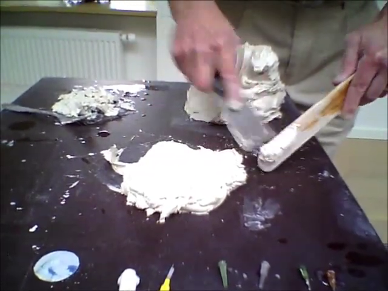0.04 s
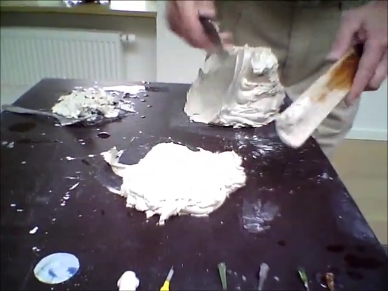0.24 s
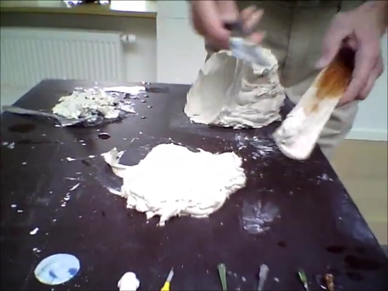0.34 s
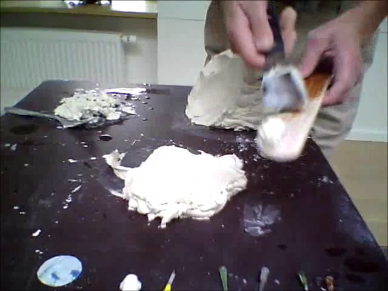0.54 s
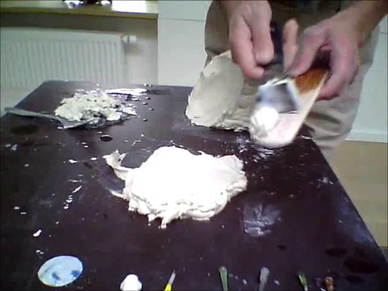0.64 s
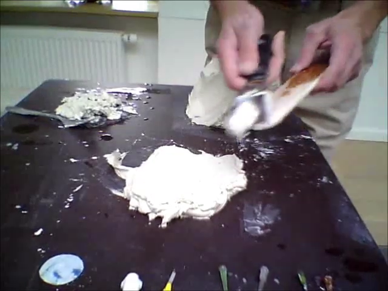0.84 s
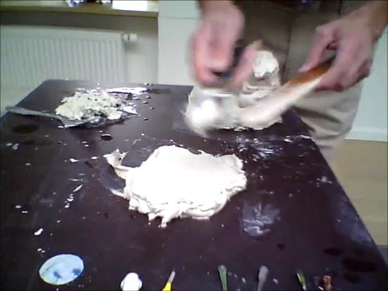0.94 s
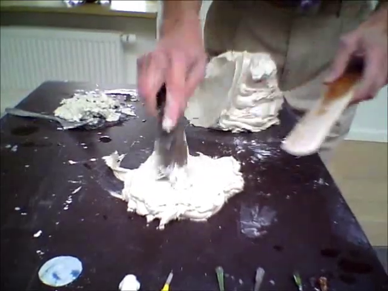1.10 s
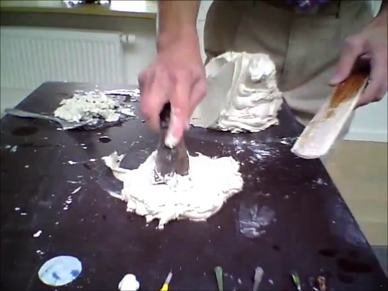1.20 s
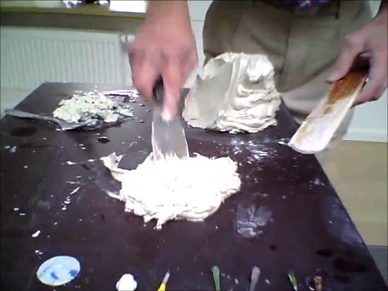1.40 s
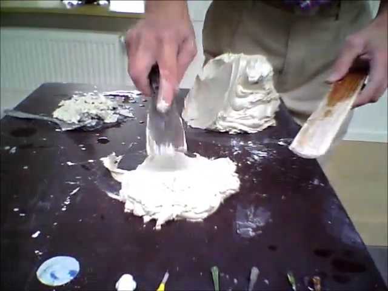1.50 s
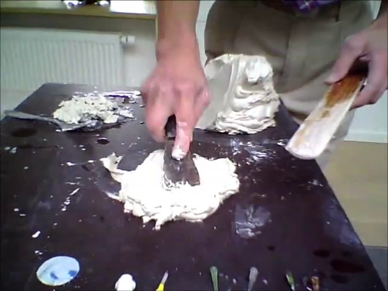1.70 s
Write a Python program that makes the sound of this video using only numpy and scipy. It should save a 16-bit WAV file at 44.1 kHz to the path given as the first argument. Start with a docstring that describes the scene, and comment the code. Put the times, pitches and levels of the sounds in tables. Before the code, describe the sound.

A steel scraper drags soft clay off a wooden paddle and clacks against its edge. A lighter tap, faint scrapes and small wet ticks follow, heard close in a small workshop with low rumble and hiss.

```python
"""A steel scraper drags soft clay off a wooden paddle, slips over the edge and clacks against it.
It taps the paddle, wipes off more clay, presses it into the heap and lifts away with a wet tick.
Grit under the blade makes the scrape; each hit is a ring of blade or wood plus a burst of noise.
A small, hard-walled workshop rings behind each contact, over a low rumble and faint hiss."""
import sys
import numpy as np
from scipy import signal
from scipy.fft import rfft, irfft
from scipy.io import wavfile

SR = 44100
rng = np.random.default_rng(int(sys.argv[2]) if len(sys.argv) > 2 else 0)


def output_pcm(signal):
    """Save a mono or channel-first signal as 16-bit PCM at the path in sys.argv[1].

    Samples are clipped to [-1, 1] before scaling.
    """
    pcm = np.clip(np.atleast_2d(signal).T, -1, 1) * 32767
    wavfile.write(sys.argv[1], SR, np.round(pcm).astype(np.int16))


N = 77175
TIME = np.arange(N) / SR   # s


def from_db(db):
    """Decibels to gain."""
    return 10 ** (np.asarray(db) / 20)


def rms_one(x):
    """Scale to an rms of one."""
    return x / np.sqrt(np.mean(x ** 2) + 1e-20)


def unit_energy(x):
    """Scale to an energy of one."""
    return x / np.sqrt(np.sum(x ** 2) + 1e-20)


def at_hz(points, hz):
    """Read a curve on a log-frequency axis."""
    freqs, values = np.transpose(points)
    return np.interp(np.log(np.maximum(hz, 1)), np.log(freqs), values)


def through(x, response):
    """Pass a sound through an impulse response."""
    return signal.fftconvolve(x, response)[:N]


def butter(x, hz, kind="low", order=2):
    """Butterworth low-, high- or band-pass."""
    return signal.sosfilt(signal.butter(order, hz, kind, fs=SR, output="sos"), x + 1e-18)


def brighten(x, treble_db, corner_hz=2780):
    """Treble shelf."""
    low = butter(x, corner_hz, order=1)
    return low + from_db(treble_db) * (x - low)


def eq(points, size=8192):
    """Minimum-phase impulse response shaped by an EQ curve, with unit energy."""
    gain = from_db(at_hz(points, np.arange(size // 2 + 1) * SR / size))
    cepstrum = irfft(np.log(gain))
    cepstrum[1:size // 2] *= 2
    cepstrum[size // 2 + 1:] = 0
    return unit_energy(irfft(np.exp(rfft(cepstrum))))


def body(modes):
    """Impulse response of decaying modes of alternating polarity, with unit energy."""
    t = TIME[:SR // 2]
    ring = 0
    for k, (hz, db, t60) in enumerate(modes):
        mode = np.sin(2 * np.pi * hz * t) * np.exp(-np.log(1000) * t / t60)
        ring += (-1) ** k * from_db(db) * unit_energy(mode)
    return unit_energy(ring)


def contact(start_s, decay_s, size=2048):
    """A dying burst of tiny collisions with an even spectrum and unit energy."""
    fade = np.exp(-TIME[:size] / decay_s)
    burst = rng.standard_normal(size) * fade
    for _ in range(6):
        whitened = irfft(np.exp(1j * np.angle(rfft(burst))))
        burst = np.sign(whitened) * fade
    return np.concatenate([np.zeros(int(start_s * SR)), unit_energy(burst), np.zeros(N)])[:N]


def bursts(hits):
    """The rough, noisy force of a series of hits."""
    return sum(from_db(db) * brighten(contact(s, decay_s), treble_db)
               for s, db, decay_s, treble_db in hits)


def impulses(hits):
    """The clean push of each hit, which sets the modes ringing."""
    return sum(from_db(db) * brighten(signal.unit_impulse(N, int(s * SR)), treble_db)
               for s, db, _, treble_db in hits)


def steady(response):
    """Steady noise through a response, with an rms of one."""
    noise = rng.standard_normal(N + len(response) - 1)
    return rms_one(signal.fftconvolve(noise, response, "valid"))


# rumble and hiss, the centre of the bed: (frequency [Hz], level [dB])
BED_MID_EQ = [(12, -27), (20, -1.5), (146, -18), (226, -21), (435, -25), (837, -30), (1010, -29),
              (1370, -35), (1900, -34), (2930, -37.5), (6290, -41), (6830, -42.5), (13500, -41)]
# rumble and hiss, the width of the bed: (frequency [Hz], level [dB])
BED_SIDE_EQ = [(12, -34), (20, -3.5), (53, -1), (87, -20), (793, -35), (884, -35), (1130, -37.5),
               (2700, -44), (6470, -42.5), (13500, -43.5)]


def room_tone(hum_hz=134.9, hum_t60_s=0.45, pan_db=1.1):
    """A wide bed of low rumble, wavering hum and faint hiss; the lows lean right."""
    mid = from_db(-64) * steady(eq(BED_MID_EQ))
    mid += from_db(-73) * steady(body([(hum_hz, 0, hum_t60_s)]))
    side = from_db(-61) * steady(eq(BED_SIDE_EQ))
    bed = np.array([mid + side, mid - side])
    rumble = butter(bed, hz=100, order=1)
    return bed + rumble * (from_db([[-pan_db], [pan_db]]) - 1)


# strokes through clay: (peak time [s], level [dB], rise [s], release [s], treble [dB], blade ring [dB])
SCRAPE_STROKES = [(.004, -49, 0.06, 0.027, -4, -43), (.11, -59, 0.1, 0.14, 0.5, -8.5),
                  (.206, -55, 0.013, 0.024, 13, -21), (0.641, -70.5, 0.15, 0.025, 5.5, -6),
                  (.779, -68, 0.0041, 0.024, 10.5, -23), (0.833, -60.5, 0.018, 0.035, 1.5, -30),
                  (.98, -62.5, 0.11, 0.18, -1, -36), (1.04, -64.5, 0.011, 0.0062, 14, -17),
                  (1.064, -63.5, 0.0041, 0.0071, 10.5, -27), (1.14, -69, 0.046, 0.041, -24, -27),
                  (1.269, -77.5, 0.028, 0.043, 10.5, -23.5), (1.38, -74, 0.046, 0.069, 2, -6)]
# the rasp of steel on gritty clay: (frequency [Hz], level [dB])
FRICTION_EQ = [(150, -18), (700, -4), (1300, -5), (1900, 0), (3600, -1), (4600, -8.5), (5700, -10),
               (8000, -8), (10500, -10), (13500, -10)]
# the thin ring of the blade: (frequency [Hz], level [dB], t60 [s])
STEEL_MODES = [(2004, -1.5, 0.015), (2067, 4, 0.013), (2730, -4.5, 0.0088), (3210, 8.5, 0.026),
               (4700, 3.5, .008)]


def scraping(grains_per_s=3500, flutter_hz=41, flutter_db=1.5):
    """Fine grit and smooth smear under the blade swell with each stroke and make it sing faintly."""
    grit = (rng.random(N) < grains_per_s / SR) * rng.choice([-1, 1], N)
    flutter = rms_one(butter(rng.standard_normal(N), flutter_hz))
    smear = from_db(-5.5) * rng.standard_normal(N)
    force = rms_one((rms_one(grit) + smear) * from_db(flutter_db * flutter))
    rasp = through(force, eq(FRICTION_EQ))
    ring = through(force, body(STEEL_MODES))
    out = 0
    for s, db, rise_s, release_s, treble_db, ring_db in SCRAPE_STROKES:
        swell = from_db(db) * np.exp(-np.maximum((s - TIME) / rise_s, (TIME - s) / release_s))
        out += swell * (brighten(rasp, treble_db) + from_db(ring_db) * ring)
    return out


# dull sounds of paddle and worktop; the first two rows are a low ring already dying as the scene opens, the
# rest dull pushes: (peak time [s], level [dB], half length [s], pitch [Hz], t60 [s])
DULL_SOUNDS = [(.005, -60, 0.0089, 339, 0.1), (.005, -59.5, 0.014, 732, 0.095), (.84, -60, 0.063, 32, 0.2),
               (1.06, -56, 0.0067, 32.6, 0.07), (1.253, -59, .02, 95, .12)]


def thuds():
    """The paddle and worktop sound dully: a low ring already dying as the scene opens, then soft pressure."""
    out = 0
    for s, db, half_s, hz, t60 in DULL_SOUNDS:
        swell = np.exp(-((TIME - s) / half_s) ** 2)
        thud = through(swell * rng.standard_normal(N), body([(hz, 0, t60)]))
        out += from_db(db) * np.linalg.norm(swell) * unit_energy(thud)
    return out


# the blade clatters over the paddle's edge: (time [s], level [dB], decay [s], treble [dB])
CLACK_HITS = [(.2115, -7, 0.0038, 1), (.2150, -6.5, 0.0028, -15), (.2175, -7.5, 0.0093, -4.5),
              (.2212, -10.5, 0.0015, 5.5), (.2241, 2, 0.0011, -6.5), (.2251, 1, 0.0015, 1.5),
              (.2283, 0, 0.0037, -16.5), (.2417, -4.5, .0025, -1.5)]
# the ring of blade and paddle pressed together: (frequency [Hz], level [dB], t60 [s])
STEEL_ON_WOOD_MODES = [(210.4, -12.5, 0.13), (758, 1, .055), (865, 0, 0.018), (953, -3, .055),
                       (1328, 1, 0.062), (1550, 3.5, 0.022), (1714, -5.5, .025), (2470, -13.5, .018),
                       (3760, 3, .02), (3750, -6.5, .03), (4346, 8, .018), (6370, -8, .018),
                       (6660, 3, .016), (7300, 4, .018), (9030, -6, 0.029)]
# the dry crack of the attack: (frequency [Hz], level [dB])
CRACK_EQ = [(70, -15.5), (180, -13.5), (400, -12.5), (600, -5.5), (950, -3), (1150, -7), (1600, -1.5),
            (2000, -6.5), (2600, -2), (3200, -4.5), (4400, -2.5), (5700, -12.5), (7500, -10.5),
            (10000, -11), (13500, -9)]


def clack():
    """The blade slips off the clay and clatters on the paddle; returns ring and crack."""
    ring = from_db(-5.5) * through(impulses(CLACK_HITS), body(STEEL_ON_WOOD_MODES))
    crack = from_db(-1.5) * through(bursts(CLACK_HITS), eq(CRACK_EQ))
    return ring, crack


# the clay-covered blade taps the paddle: (time [s], level [dB], decay [s], treble [dB])
TAP_HITS = [(.7655, -23.5, 0.00054, 1), (.7665, -19.5, 0.002, 0.5)]
# the paddle's ring, choked by clay: (frequency [Hz], level [dB], t60 [s])
DAMPED_WOOD_MODES = [(524, -5, 0.008), (1040, -2, 0.037), (1950, 1, 0.021), (2250, 4, 0.016),
                     (3300, -3, 0.029), (3850, -9.5, 0.01), (4960, -32, .012)]
# the soft knock of the attack: (frequency [Hz], level [dB])
KNOCK_EQ = [(150, -15), (500, -0.5), (1300, -0.5), (2200, 4), (4500, 0), (5800, -13), (13500, -12)]


def tap():
    """The blade lands on the paddle again, cushioned by clay; returns ring and knock."""
    ring = from_db(-2.5) * through(impulses(TAP_HITS), body(DAMPED_WOOD_MODES))
    knock = from_db(-5.5) * through(bursts(TAP_HITS), eq(KNOCK_EQ))
    return ring, knock


# stick-slip as the blade leaves the paddle: (time [s], level [dB], decay [s], treble [dB])
SLIP_HITS = [(1.0575, -29.5, 0.0021, -4), (1.0620, -26, 0.0072, -5), (1.0675, -35.5, 0.003, -15)]


def slips():
    """A short chatter of steel ring and rasp as clay grips the blade and lets it slide."""
    force = bursts(SLIP_HITS)
    return through(force, body(STEEL_MODES)) + from_db(-2) * through(force, eq(FRICTION_EQ))


# wet ticks as the blade enters and leaves the heap:
# (time [s], level [dB], decay [s], low cut [Hz], high cut [Hz], pop pitch [Hz], pop level [dB])
WET_TICKS = [(1.3394, -36.5, 0.0012, 550, 980, 1100, -7), (1.344, -35, .002, 700, 7070, 2153, -4),
             (1.6114, -32.5, 0.0014, 2610, 4130, 810, -8), (1.6120, -39, 0.0032, 1440, 2140, 1508, -4)]


def ticks(pop_t60_s=0.034, spray_db=-4.5):
    """Sticky clay smacks against the blade and lets go of it; small air pockets pop."""
    out = 0
    for s, db, decay_s, low_hz, high_hz, pop_hz, pop_db in WET_TICKS:
        force = contact(s, decay_s)
        smack = unit_energy(butter(force, [low_hz, high_hz], "band"))
        pop = unit_energy(through(force, body([(pop_hz, 0, pop_t60_s)])))
        out += from_db(db) * (smack + from_db(pop_db) * pop + from_db(spray_db) * force)
    return out


# the length of the workshop's tail: (frequency [Hz], t60 [s])
TAIL_T60 = [(200, .5), (530, 0.65), (1400, .5), (3700, 0.6938), (9700, 0.48)]
# the tone of that tail: (frequency [Hz], level [dB])
TAIL_EQ = [(150, 8), (500, 3), (1000, -5.5), (1500, -2), (2300, -0.5), (4000, -5), (7000, -5), (13000, -8)]


def workshop(x, build_s=0.0023, early_decay_s=0.0096):
    """One channel of reverb: early scatter off worktop and body, then a tail dying band by band."""
    t, edges_hz = TIME[:SR], np.geomspace(80, 16000, 12)
    tail = 0
    for low, high in zip(edges_hz, edges_hz[1:]):
        hz = np.sqrt(low * high)
        noise = butter(rng.standard_normal(SR), [low, high], "band")
        fade = np.exp(-np.log(1000) * t / at_hz(TAIL_T60, hz))
        tail += from_db(at_hz(TAIL_EQ, hz)) * noise * fade
    tail = unit_energy(tail * (1 - np.exp(-t / build_s)))
    early = unit_energy(rng.standard_normal(SR) * np.exp(-t / early_decay_s))
    early = brighten(early, treble_db=8)   # short waves scatter most
    return through(x, from_db(-11) * tail + from_db(-15.5) * early)


def mic_port(x):
    """One microphone port: the treble also arrives by short paths round the case."""
    treble = butter(x, hz=6530, kind="high")
    return x + from_db(-6.5) * through(treble, contact(0, decay_s=0.0018))


def scene(ring_send_db=-14, right_delay_s=26e-6):
    """The tools sit slightly left; clack and tap ring close and dry while their attacks fill the room."""
    clack_ring, crack = clack()
    tap_ring, knock = tap()
    ring = clack_ring + tap_ring
    textures = scraping() + thuds() + crack + knock + slips() + ticks()
    tools = textures + ring
    # little ring goes to the room, so the tail stays smooth and diffuse
    send = textures + from_db(ring_send_db) * ring
    hz = np.arange(N + 1) * SR / (2 * N)
    left = brighten(tools, treble_db=0.5)
    right = irfft(rfft(tools, 2 * N) * np.exp(-2j * np.pi * hz * right_delay_s))[:N]
    direct = np.array([mic_port(left), mic_port(right)])
    reverb = np.array([workshop(send), workshop(send)])
    return direct + reverb + room_tone()


def record(dry):
    """A steep high cut on the whole mix."""
    cutoff_hz = 13800
    return signal.sosfilt(signal.ellip(10, .1, 80, cutoff_hz, fs=SR, output="sos"), dry)


dry = scene()
out = record(dry)
output_pcm(out)
```